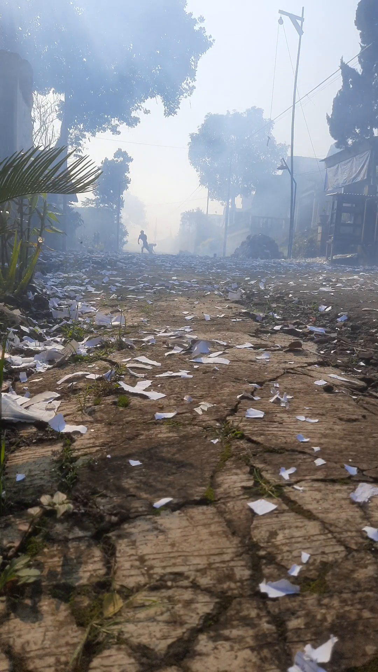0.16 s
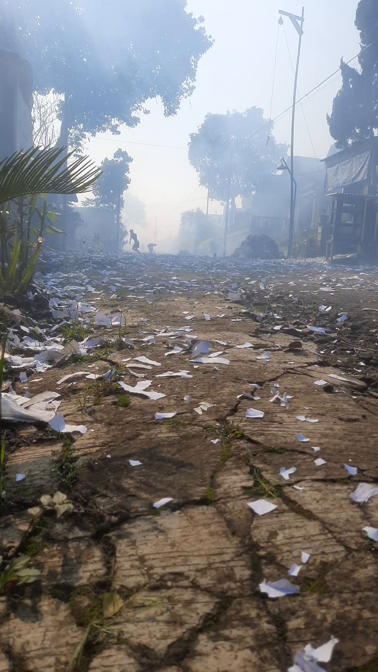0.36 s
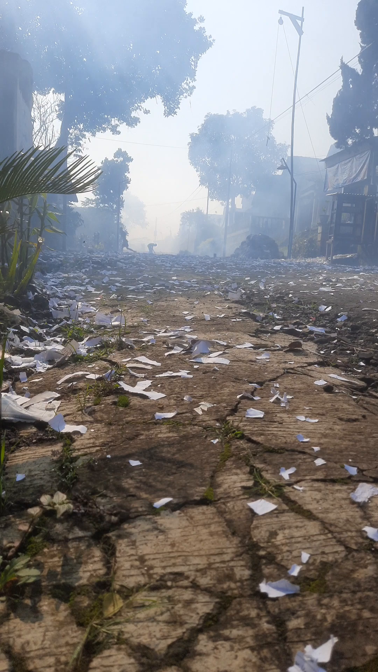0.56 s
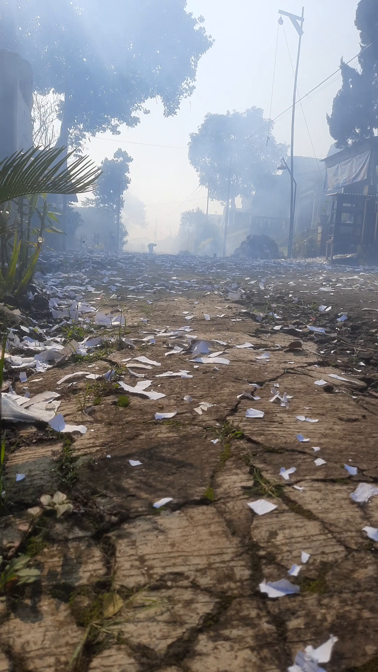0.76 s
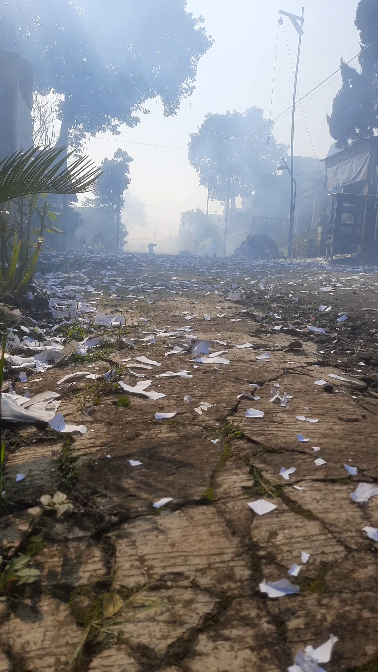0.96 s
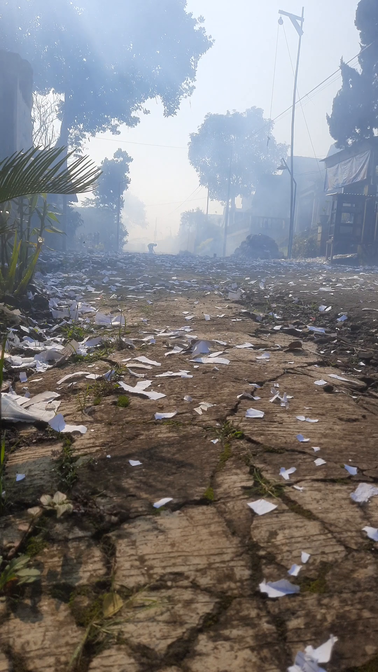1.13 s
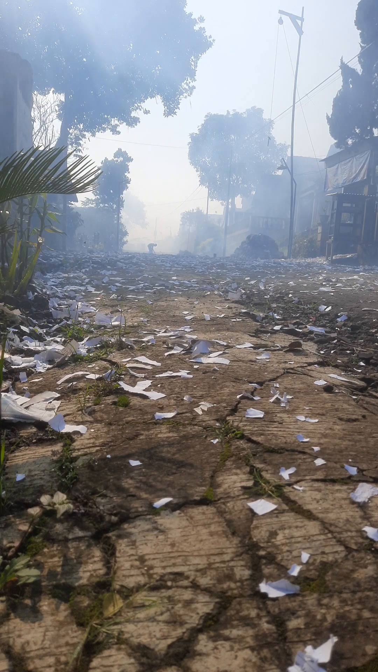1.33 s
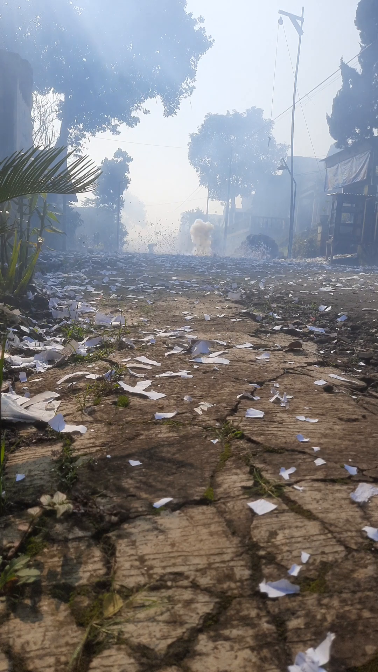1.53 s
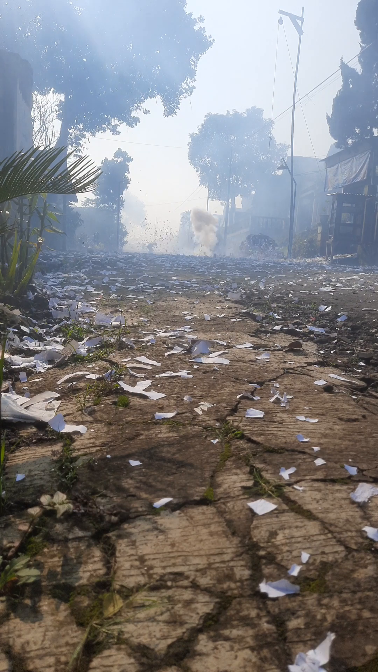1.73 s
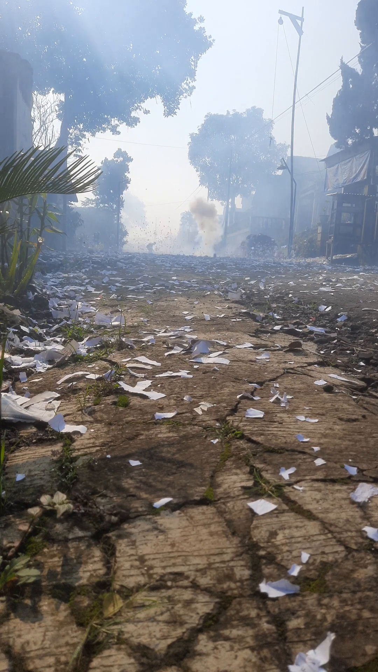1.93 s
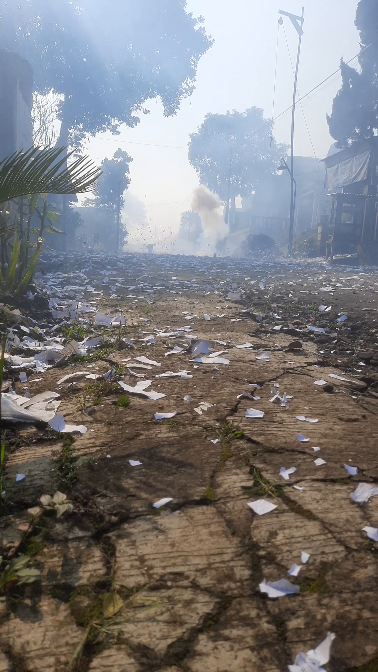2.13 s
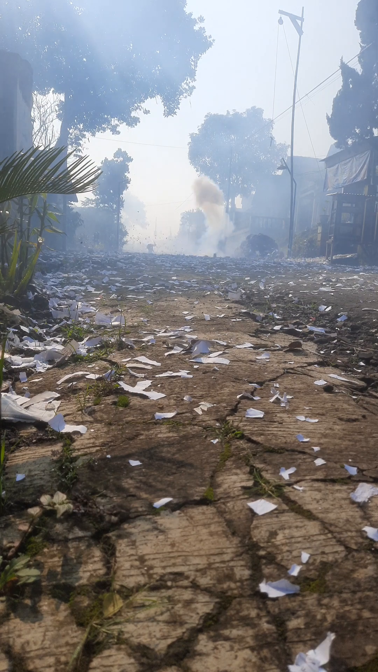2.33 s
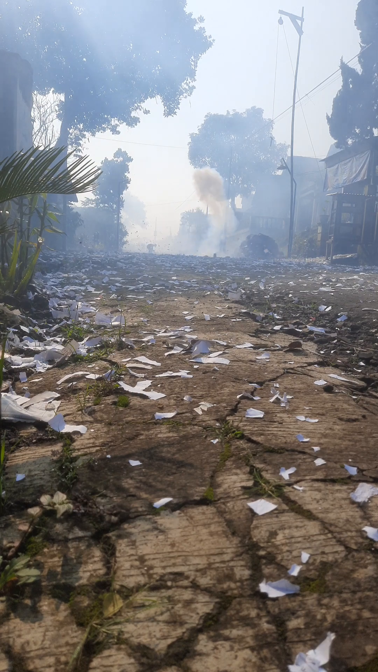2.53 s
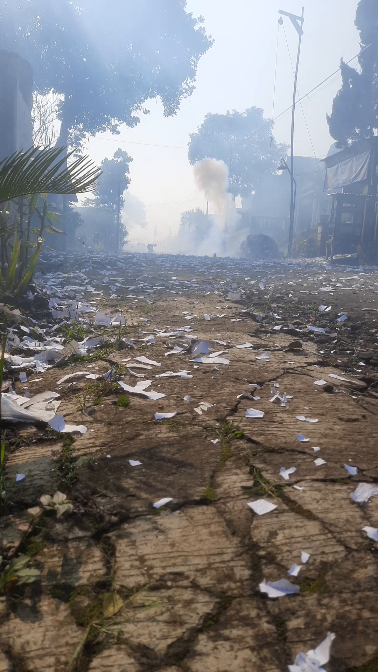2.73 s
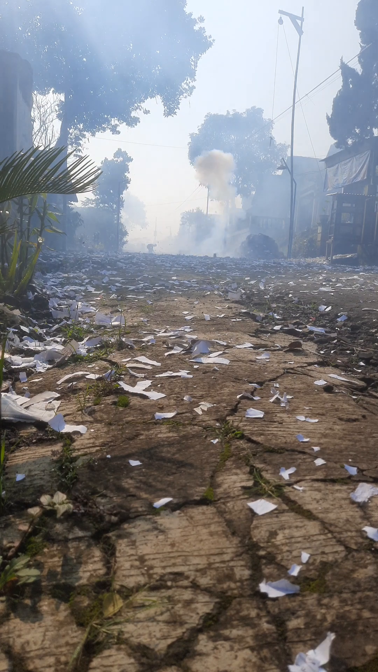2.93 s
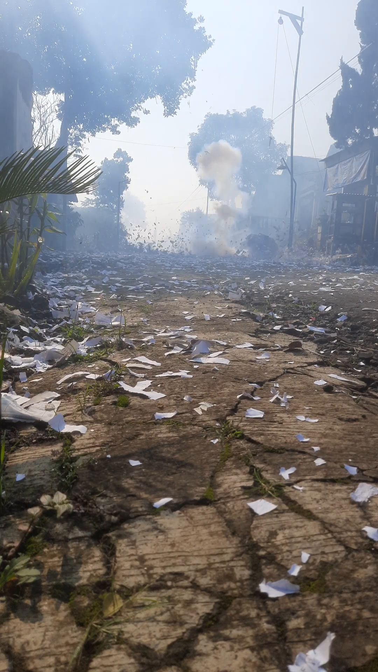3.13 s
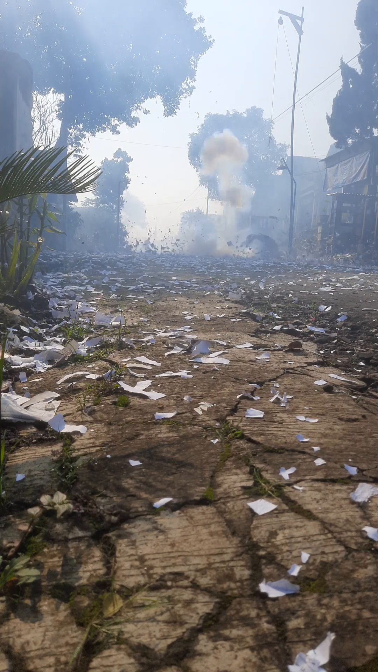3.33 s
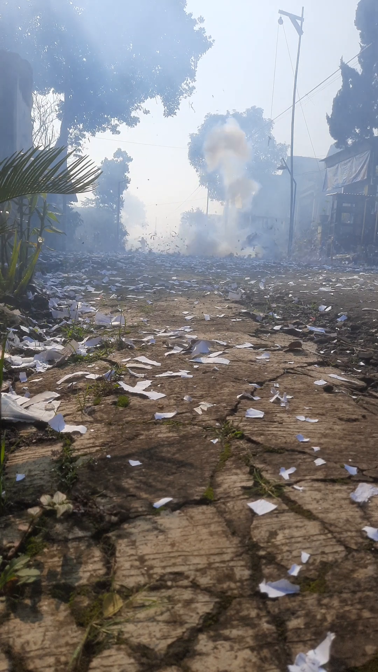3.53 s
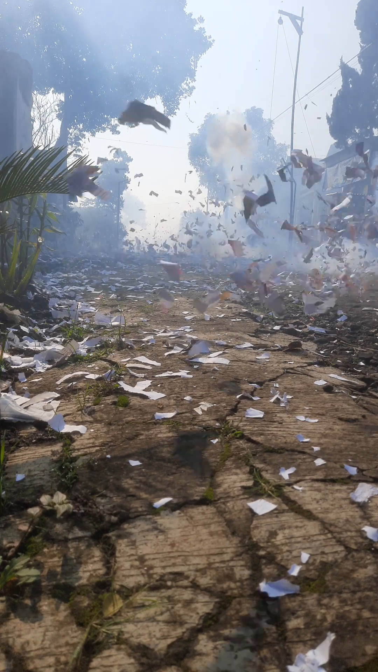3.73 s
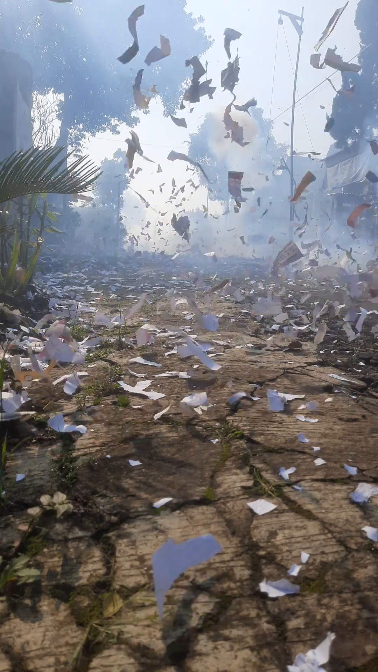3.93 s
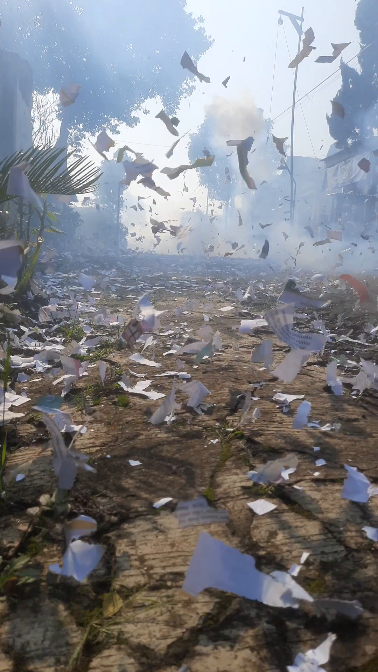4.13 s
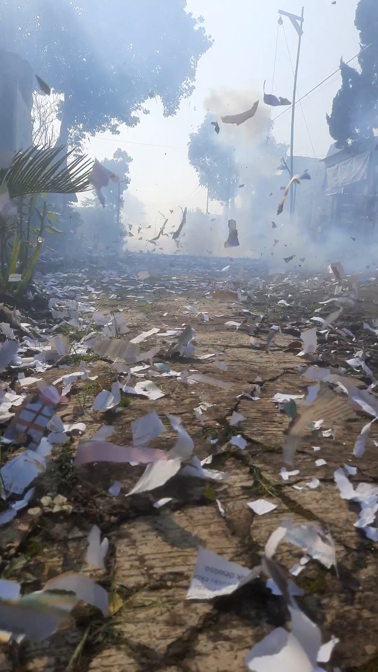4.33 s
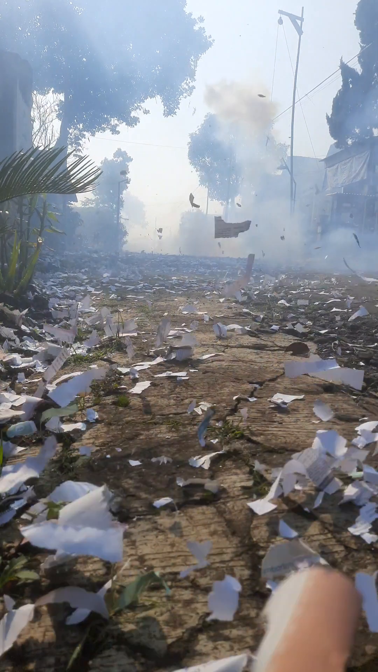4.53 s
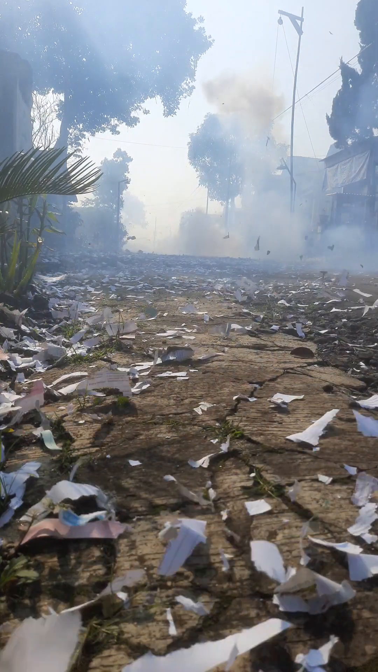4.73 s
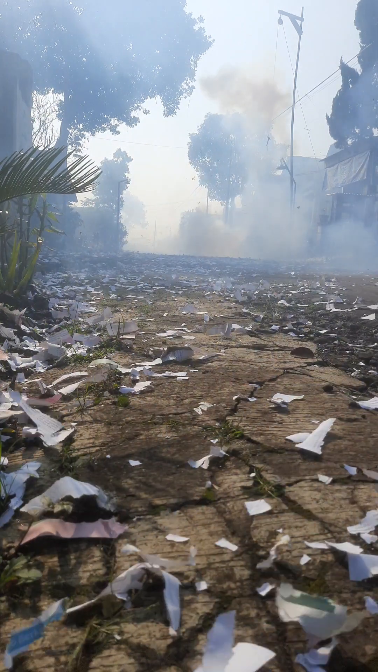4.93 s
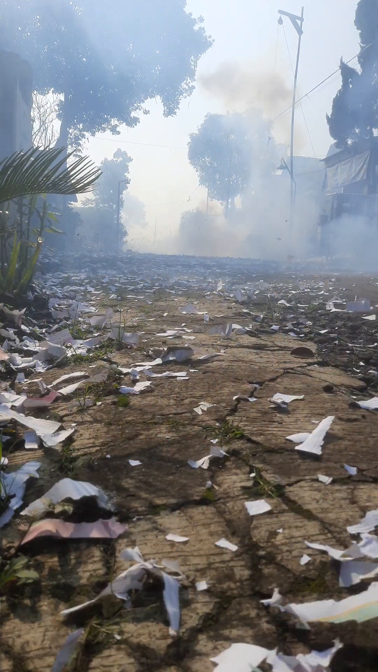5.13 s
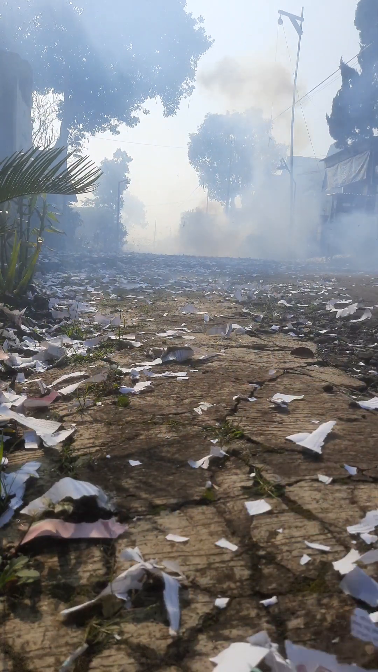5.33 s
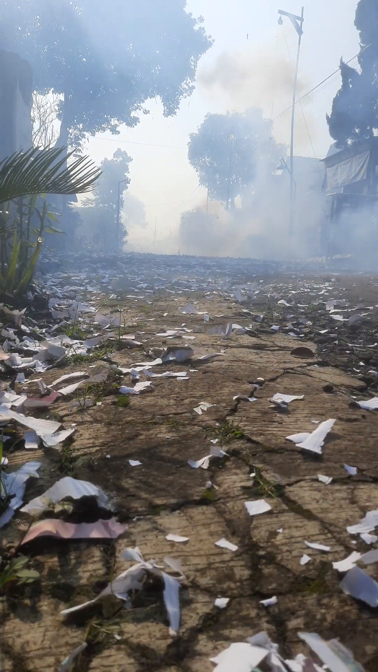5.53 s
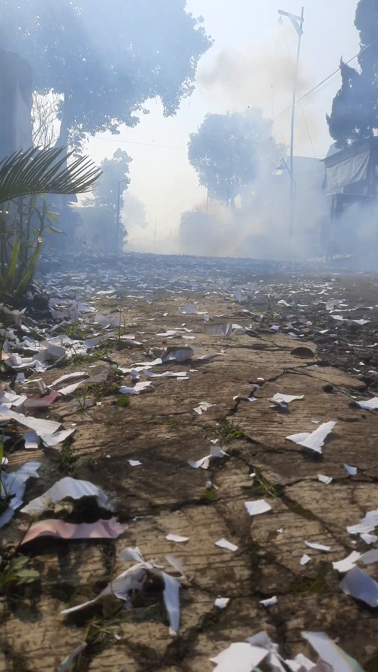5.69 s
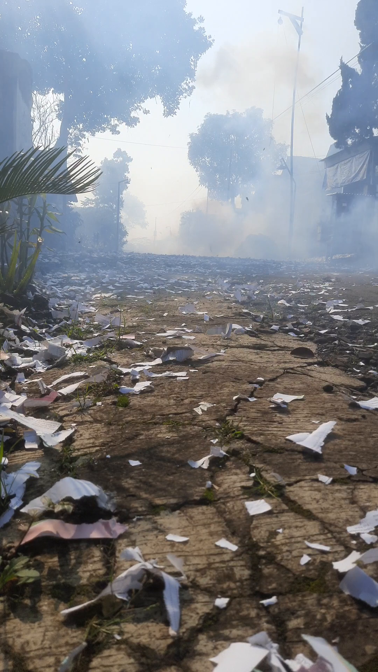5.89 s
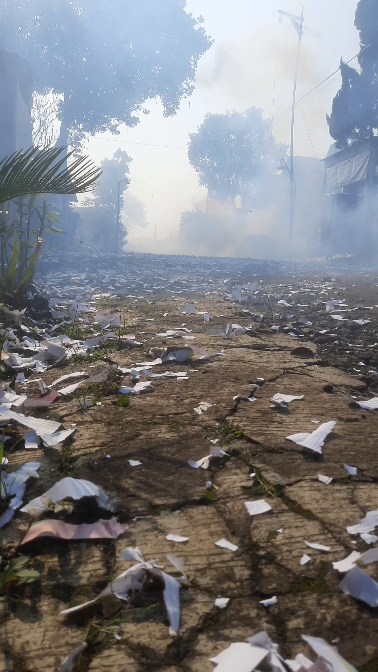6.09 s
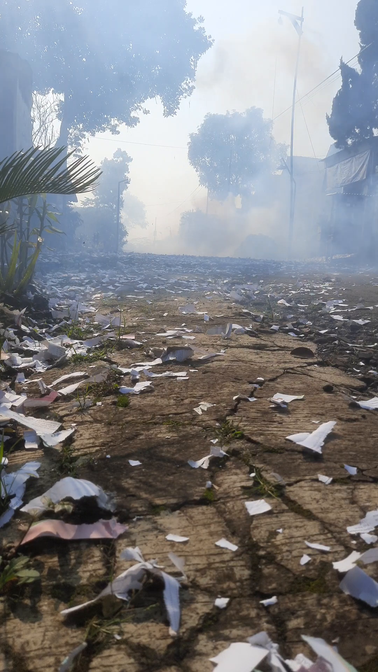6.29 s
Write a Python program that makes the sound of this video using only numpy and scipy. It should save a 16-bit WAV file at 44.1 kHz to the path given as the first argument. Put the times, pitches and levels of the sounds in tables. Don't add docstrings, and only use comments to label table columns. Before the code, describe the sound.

Outdoors on a paved street, low rumble and a faint motor hum, with a few soft pops and knocks close to the start. Then a sharp firecracker crack, a dull distant thud, another crack, and a huge double bang with bright wall slaps. Paper scraps tick down nearby, a farther bang follows, then a last sharp one. Heard from a phone on the ground, bass pumped down after each near blast.

```python
import sys
import numpy as np
from scipy import signal
from scipy.fft import rfft, irfft, next_fast_len
from scipy.io import wavfile
from scipy.ndimage import uniform_filter1d

SR = 44100
rng = np.random.default_rng(int(sys.argv[2]) if len(sys.argv) > 2 else 0)


def materialize(psi):
    bounded = np.clip(np.atleast_2d(psi).T, -1, 1)
    quanta = np.round(bounded * 32767).astype(np.int16)
    wavfile.write(sys.argv[1], SR, quanta)


def linear_from_db(decibels):
    return 10 ** (np.asarray(decibels, float) / 20)


N = 284609
T = np.arange(N) / SR
HZ = np.maximum(np.fft.rfftfreq(next_fast_len(N), 1 / SR), 1)

# start in seconds, peak in dB, length in ms.
BLASTS = [
    (1.4645, -9, .5),
    (2.718, -34, 4.0),
    (3.0526, -12, .4),
    (3.5674, -1, .9),
    (3.662, -18, .3),
    (4.3335, -27, .6),
    (5.1418, -11, .4),
]
# start in seconds, peak in dB, pitch in Hz, decay in seconds.
THUDS = [
    (2.72, -19, 62, 0.045),
    (2.731, -9, 131, .012),
    (2.795, -9.5, 286, 0.027),
    (2.83, -9, 217, .012),
    (4.335, -24, 74.7, 0.079),
    (4.337, -11.5, 119, .012),
    (4.39, -8.5, 187, 0.023),
    (4.426, -14, 484, .02),
]
# start in seconds, peak in dB, pitch in Hz,
# left minus right in dB, ring in ms.
SLAPS = [(1.512, -17, 3000, -3, 70), (3.7, -11, 4060, -5.5, 120), (3.725, -10.5, 3000, -5, 160),
         (3.75, -7.5, 2480, -2, 100), (5.144, -11, 3020, -7, 55), (2.734, -27, 700, -3, 40),
         (2.776, -29, 2000, -3, 40), (4.334, -13, 1510, -5, 30), (4.356, -17, 1800, -1, 46),
         (4.372, -19, 1500, -3, 50), (4.394, -15, 900, -3, 56)]

# level in dB, dullness in dB, early surplus in dB, gain dip in dB, recovery in seconds.
BLAST_ECHOES = [(-4, 23, 38.5, 37, .059), (-13, 13.5, -1.5, 17, 0.032), (-4, 25.5, 47, 37, 0.067),
                (-4, 33, 46, 23.5, 0.069), (-3.5, 21.5, 44.5, 52, 0.07), (-16.5, 9.5, 5.5, 17.5, 0.029),
                (-5.5, 25.5, 36.5, 27, 0.044)]
CRACK_DB = [8.5, -6, .3, 1.7, -4, 5, 12]
CRACK_S = 0.015
# frequency in Hz, level in dB per Hz.
ECHO_COLOUR = [(25, -47), (49, -11.5), (100, -3.5), (163, -1.5), (230, -2.5), (339, -5), (457, -10),
               (669, -13.5), (831, -17.5), (1500, -20.5), (3060, -25.5), (6000, -33.5), (9000, -36),
               (16000, -52.5)]
# lower edge in Hz, upper edge in Hz.
BANDS = [(40, 330), (330, 2000), (2000, 9000), (10500, 15700)]
BAND_CENTRES = [140, 750, 7200, 12500]

# level at its start in dB, fall in dB per second, share of the dullness.
LATE_DB = [1.06, -6, -23.5, -40]
DECAY_DB_S = [52, 47.8, 36, 23.13]
DULL_SHARE = [0, .15, .49, 1]
# share of the early surplus, fading time in seconds.
EARLY_SHARE = [0.32, 0.31, 0.67, 1.273]
EARLY_S = [0.027, 0.15, 0.27, 0.2]
DIP_SHARE = [1.24, 0.5, 0.17, .39]
DIP_STRETCH = [0.98, 0.67, 0.43, 0.62]
CRACK_SHARE = [.4, 0.94, 1.16, 1.1]
FAR_WALL_DB = [1.5, 1, 2.5, 5]
MURMUR_DB = [-26.5, -31, -48.5, -65.5]

DIP_SHAPE = 1.43
NEAR_DB = 46
FAR_WALL_S, FAR_WALL_WIDTH_S = 0.36, 0.067
CARRY_DB_S = 1189.5
GROUND_DB, GROUND_SHARE = -8.5, 0.61

# start in seconds, peak in dB, pitch in Hz, left minus right in dB, ring in ms.
PAPER = [(4.112, -51, 12000, -2, 25), (4.231, -55, 12000, -2, 20), (4.246, -56, 13500, -2, 30),
         (4.258, -51, 9000, -2, 14), (4.321, -53, 12000, -3, 25), (4.388, -48, 13000, -3, 25),
         (4.493, -51, 12000, -3, 15), (4.519, -52, 13000, -2, 40), (4.603, -56, 12500, -4, 25),
         (4.713, -51, 12000, -5, 20), (4.731, -44.5, 9000, -8, 15), (4.757, -47, 8000, -10, 35),
         (4.815, -50, 13600, -12, 16), (4.859, -47, 7500, -8, 15), (4.872, -53, 10000, -3, 15),
         (4.937, -51.5, 9000, -6, 15), (5.023, -40, 4000, -10, 18), (5.045, -48, 6900, -14, 17),
         (5.052, -55, 11000, -10, 20), (5.096, -48, 7000, -12, 15)]
POP_S = [.02475, .2243, 1.07935]
POP_DB = [-1, -3, 0.5]
# corner in Hz, Q (how sharply it swings).
LOW_CUT = [(45, 3.1), (88, .95), (46, .5)]
# start in seconds, peak in dB, pitch in Hz, left minus right in dB.
KNOCKS = [
    (0.8805, -19.5, 980, -6),
    (1.173, -20, 805, -7),
]
# middle in seconds, half length in seconds, level in dB.
RUSTLE = (0.058, 0.021, -42)

# frequency in Hz, level in dB per Hz.
STREET_COLOUR = [(25, -27.5), (49, 1.5), (100, -6.5), (187, -9.5), (232, -11), (433, -13), (553, -15.5),
                 (854, -20), (1390, -21), (3500, -29.5), (4860, -36), (9000, -40), (16000, -50.5)]
STREET_DB = -34
# pitch in Hz, level in dB.
HUM = [(140, -44), (184, -40), (204.6, -48), (370.5, -41), (555, -56.5), (741, -59)]
WHINE_HZ, WHINE_DB = 1388, -57.5
# time in seconds, gain in dB.
SLOW_GAIN = [(0, -1), (1.457, -1), (1.463, -22), (2.0, -23), (2.7, -25), (2.8, -21.5), (5.13, -21),
             (5.2, -38), (5.9, -24), (6.45, -28)]

# frequency in Hz, left minus right in dB.
PORTS = [(60, -6.5), (110, -4), (200, -3.5), (380, -3), (700, -4.5), (1290, -2.5), (2380, -1.0), (4400, -2),
         (8120, -3), (15000, 3)]
# frequency in Hz, gain in dB.
MIC = [(7000, 0), (8600, 1.5), (9300, -4.5), (10200, -2.5), (11500, 5), (15000, 9)]
TOP_HZ = 15850


def fronts():
    out = np.zeros((2, N))
    for s, db, ms in BLASTS:
        t = np.arange(600) / SR / (ms / 1000)
        rise = 1 - np.exp(-(7 * t) ** 2)
        push_then_suction = (1 - 3 * t) * 1.4 * np.exp(-1.3 * t * t)
        add(out, s, linear_from_db(db) * rise * push_then_suction)
    return out


def thuds():
    out, t = np.zeros((2, N)), np.arange(12000) / SR
    for s, db, hz, decay_s in THUDS:
        swing = np.sin(2 * np.pi * hz * t * (1 - 2.1 * t))
        add(out, s, linear_from_db(db) * swing * (1 - np.exp(-t / .006)) * np.exp(-t / decay_s))
    return out


def slaps():
    return bursts(SLAPS, 2.0)


def tail(t, last_db, crack_db, level_db, dull_db, early_db, dip_db, recover_s):
    per_band = [LATE_DB, DECAY_DB_S, DULL_SHARE, EARLY_SHARE, EARLY_S, DIP_SHARE, DIP_STRETCH, CRACK_SHARE,
                FAR_WALL_DB]
    late, decay, dull, early, early_s, dip, stretch, crack, wall_db = np.array(per_band)[:, :, None]
    db = level_db + late - dull * dull_db - decay * t
    db = db + early * early_db * np.exp(-t / early_s)
    db = db + wall_db * np.exp(-((t - FAR_WALL_S) / FAR_WALL_WIDTH_S) ** 2)
    db = db + crack * crack_db * np.exp(-(t / CRACK_S) ** 2)
    dip = 1 + (dip - 1) * min(early_db / NEAR_DB, 1)
    db = db - dip * dip_db * np.exp(-(t / recover_s / stretch) ** DIP_SHAPE)
    return 10 * np.log10(linear_from_db(db) ** 2 + linear_from_db(last_db - CARRY_DB_S * t) ** 2)


def echo_levels():
    ends = BLASTS[1:] + [(N / SR + 1, 0, 1)]
    level = np.full((len(BANDS), N), -150.)
    last_db = level[:, :1].copy()
    murmur_db = np.add.outer(MURMUR_DB, np.interp(T, *np.transpose(SLOW_GAIN)))
    for row, crack_db, (start, _, ms), (end, next_db, _) in zip(BLAST_ECHOES, CRACK_DB, BLASTS, ends):
        now = (T >= start) & (T < end)
        fade_db = -max(next_db + 23.0, 0) * np.exp((T[now] - end) / 0.0023)
        fade_db -= 40 * np.exp((start - T[now]) * 2500 / ms)
        db = tail(T[now] - start, last_db, crack_db, *row)
        last_db = db[:, -1:]
        level[:, now] = 10 * np.log10(linear_from_db(db) ** 2 + linear_from_db(murmur_db[:, now]) ** 2) + fade_db
    return level


def echoes():
    level = echo_levels()
    colour = linear_from_db(on_log(ECHO_COLOUR, HZ))
    share = [np.sum(colour[(HZ > lo) & (HZ < hi)] ** 2) / len(HZ) for lo, hi in BANDS]
    ground_db = GROUND_DB - (1 - GROUND_SHARE) * np.maximum(level[0], -60)
    level -= 10 * np.log10(share)[:, None]
    ground_db += level[0]
    clicks = swarm(rate=16000, scatter_db=1.4, lag_ms=.28, shade_db=3.7)
    clicks = rfft(clicks, next_fast_len(N)) * colour
    steps = np.arange(-1, 3 * len(BANDS)) / 3
    slice_hz = [55, 95] + BAND_CENTRES + [15800]
    place = np.interp(np.log(HZ), np.log(slice_hz), [steps[0], 0, *range(len(BANDS)), steps[-1]])
    out = 0
    for p in steps:
        k = min(int(p), len(BANDS) - 2)
        db = level[k] + (p - k) * (level[k + 1] - level[k]) if p >= 0 else ground_db
        slice_gain = np.maximum(1 - 3 * abs(place - p), 0)
        out = out + linear_from_db(db) * irfft(clicks * slice_gain, next_fast_len(N))[:, :N]
    return out


def paper():
    return bursts(PAPER, 1.5)


def pops():
    step = np.zeros((2, N))
    for s, db in zip(POP_S, POP_DB):
        step[0, int(s * SR):][:5] = linear_from_db(db) * np.array([-.08, .4, .2, .0, .4])
    return low_cut(np.cumsum(step, axis=1))


def low_cut(x):
    for hz, q in LOW_CUT:
        w = 2 * np.pi * hz
        x = signal.lfilter(*signal.bilinear([1, 0, 0], [1, w / q, w * w], SR), x)
    return x


def knocks():
    out, t = np.zeros((2, N)), np.arange(800) / SR
    for s, db, hz, pan_db in KNOCKS:
        add(out, s, linear_from_db(db) * np.sin(2 * np.pi * hz * t) * np.exp(-t / 0.00074), pan_db)
    return out


def rustle():
    s, half_s, db = RUSTLE
    hiss = shape(rng.standard_normal((2, N)), np.exp(-(np.log(HZ / 9000) / 0.81) ** 2))
    return linear_from_db(db) * np.exp(-((T - s) / half_s) ** 2) * hiss


def street():
    noise = swarm(rate=9000, scatter_db=1.1, lag_ms=0.15, shade_db=1.7) + 0.66 * rng.standard_normal((2, N))
    air = shape(noise, linear_from_db(on_log(STREET_COLOUR, HZ)))
    gain_db = np.interp(T, *np.transpose(SLOW_GAIN))
    out = air / air.std() * linear_from_db(STREET_DB - 2.0 + .5 * walk(5) + gain_db)
    tones = [(hz, db + 0.93 * gain_db) for hz, db in HUM]
    tones += [(WHINE_HZ, WHINE_DB + 0.72 * gain_db)]
    for hz, db in tones:
        loudness = np.sqrt(2) * linear_from_db(db + 2.0 * walk(13))
        out = out + loudness * np.sin(2 * np.pi * np.cumsum(hz + .9 * walk(4)) / SR)
    return out * linear_from_db(np.array([[-1.3], [1.3]]))


def swarm(rate, scatter_db, lag_ms, shade_db):
    when, size, sign, side = rng.random((int(rate * N / SR), 4)).T
    size = np.sign(sign - .5) * linear_from_db(-scatter_db * np.log(size + 1e-4))
    side = np.array([2 * side - 1, 1 - 2 * side])
    at = np.clip(when * N + side * lag_ms * SR / 2000, 0, N - 1).astype(int)
    heard = size * linear_from_db(-shade_db * side)
    out = np.array([np.bincount(i, g, N) for i, g in zip(at, heard)])
    return out / out.std()


def bursts(events, q):
    out, t = np.zeros((2, N)), np.arange(2400) / SR
    chance = rng.standard_normal((40, len(t)))
    for (s, db, hz, pan_db, ms), rough in zip(events, chance):
        b, a = signal.iirpeak(min(hz, 15000), q, fs=SR)
        ring = signal.lfilter(b, a, signal.lfilter(b, a, rough))
        fade = np.exp(-np.log(1000) * t * 1000 / ms)
        add(out, s, linear_from_db(db) * ring * fade, pan_db)
    return out


def walk(rate):
    k = int(SR / rate)
    held = np.repeat(rng.standard_normal(N // k + 1), k)
    return 1.5 * uniform_filter1d(uniform_filter1d(held, k), k)[:N]


def add(out, s, sound, pan_db=0.):
    i = int(s * SR)
    out[:, i:i + len(sound)] += linear_from_db(np.array([[pan_db], [-pan_db]]) / 2) * sound


def on_log(table, hz):
    f, v = np.transpose(table)
    return np.interp(np.log(hz), np.log(f), v)


def shape(x, gain):
    return irfft(rfft(x, next_fast_len(N)) * gain, next_fast_len(N))[..., :N]


def scene():
    air = fronts() + thuds() + slaps() + echoes() + paper() + street()
    tilt_db = on_log(PORTS, HZ) / 2
    heard = shape(air, linear_from_db(on_log(MIC, HZ) + np.array([tilt_db, -tilt_db])))
    return heard + pops() + knocks() + rustle()


def roll_off(x):
    return signal.sosfilt(signal.butter(12, 16960, fs=SR, output="sos"), x)


def record(dry):
    over = np.maximum(abs(dry) - .55, 0)
    soft = dry - np.sign(dry) * (over - .45 * np.tanh(over / .45))
    mix = shape(soft, 1 / (1 + (HZ / TOP_HZ) ** 300))
    return roll_off(mix)


dry = scene()
out = record(dry)
materialize(out)
```